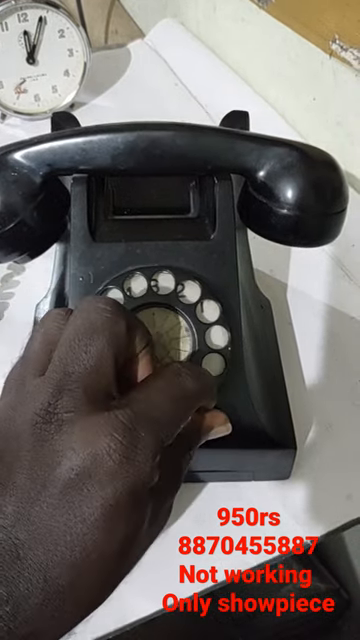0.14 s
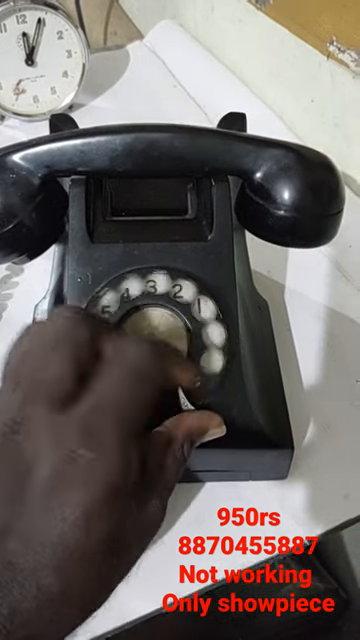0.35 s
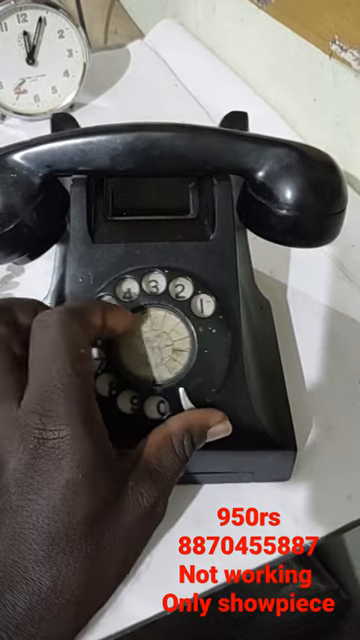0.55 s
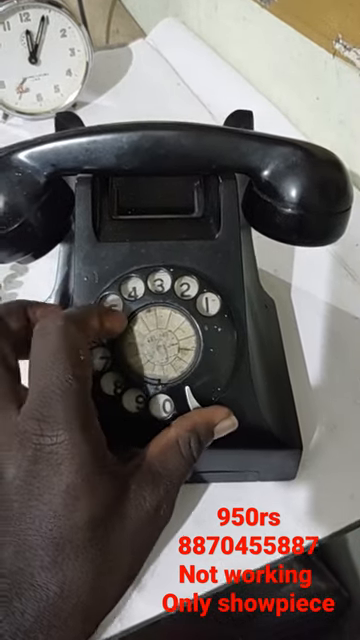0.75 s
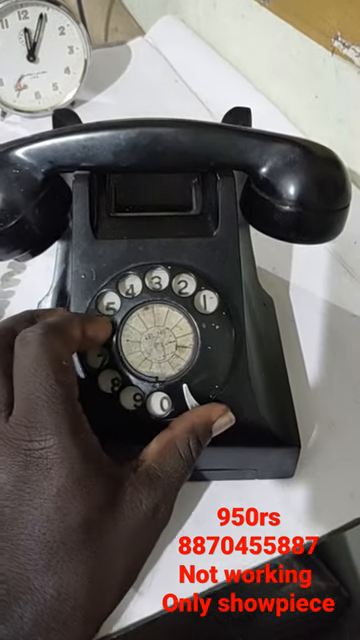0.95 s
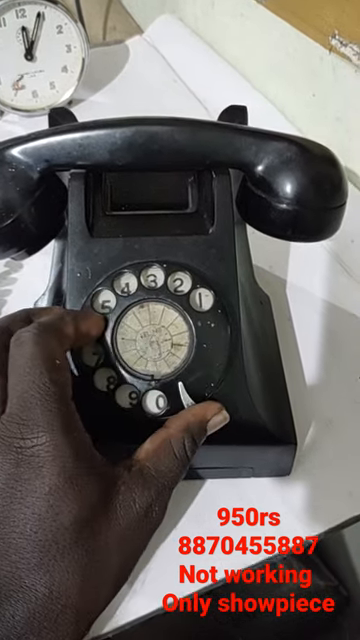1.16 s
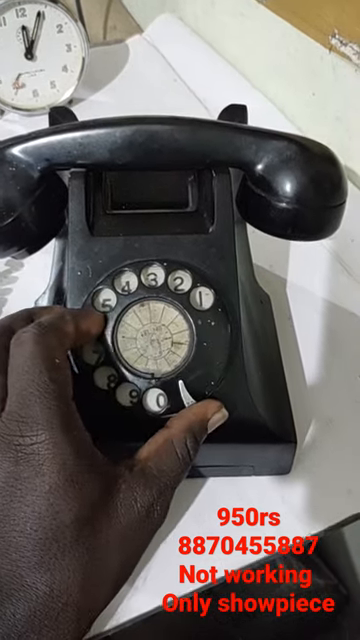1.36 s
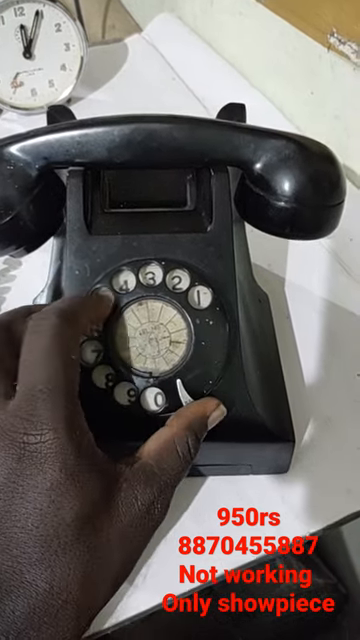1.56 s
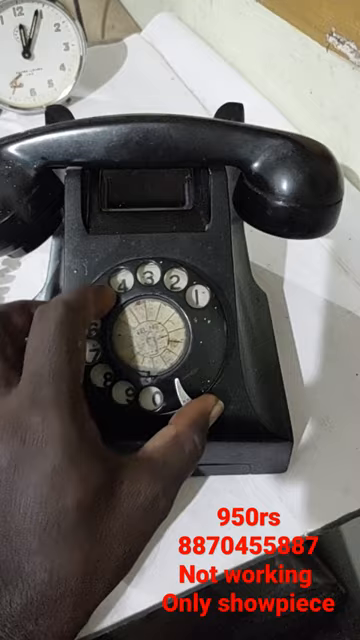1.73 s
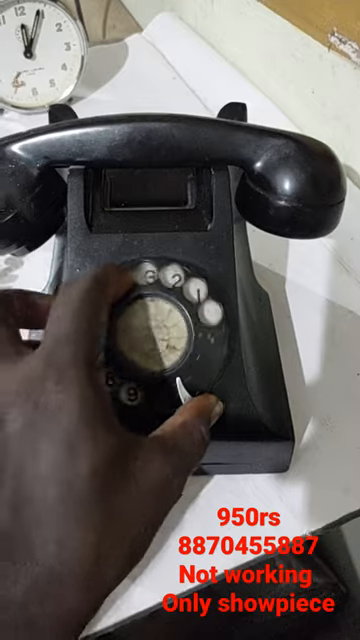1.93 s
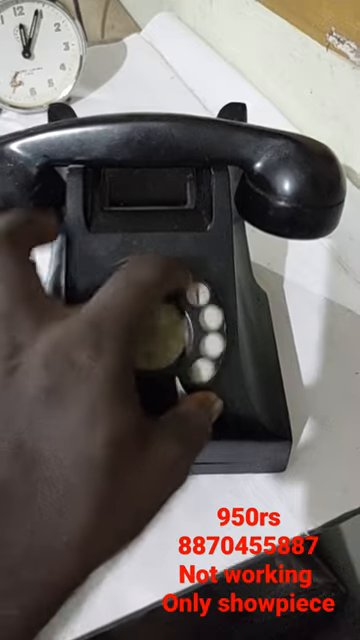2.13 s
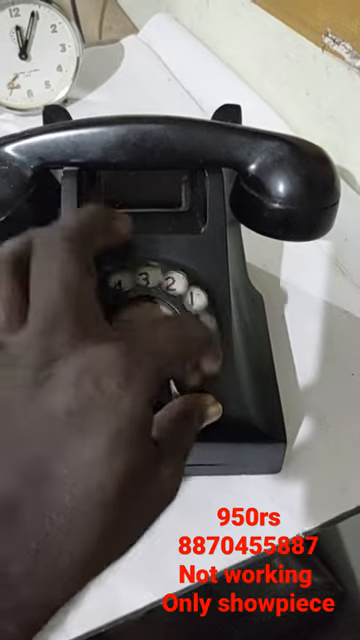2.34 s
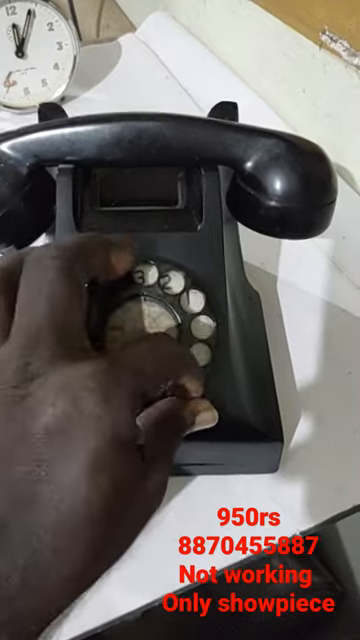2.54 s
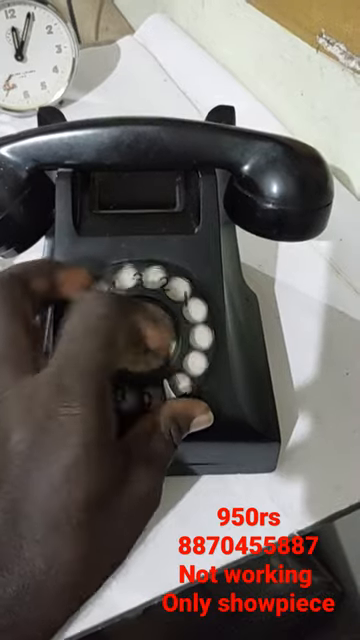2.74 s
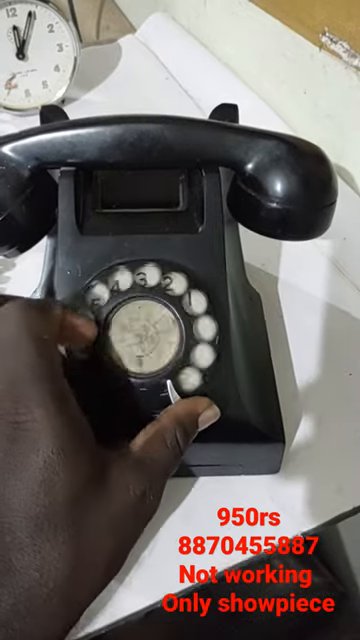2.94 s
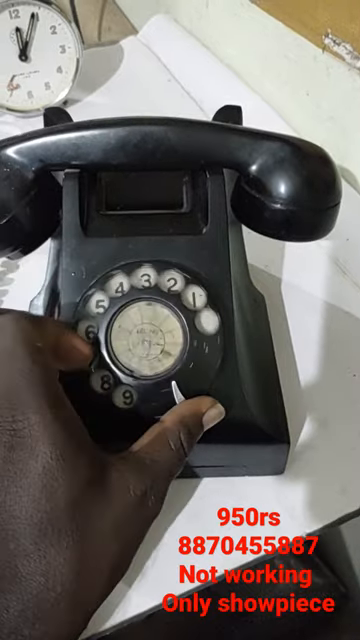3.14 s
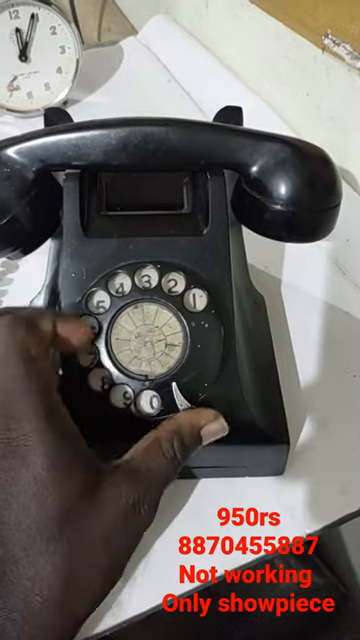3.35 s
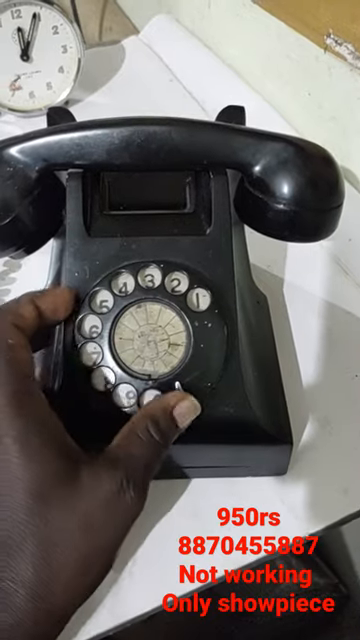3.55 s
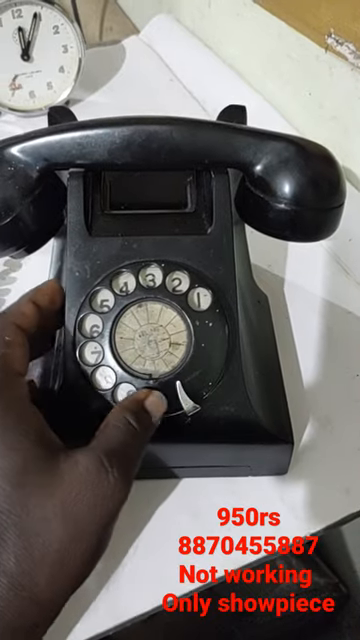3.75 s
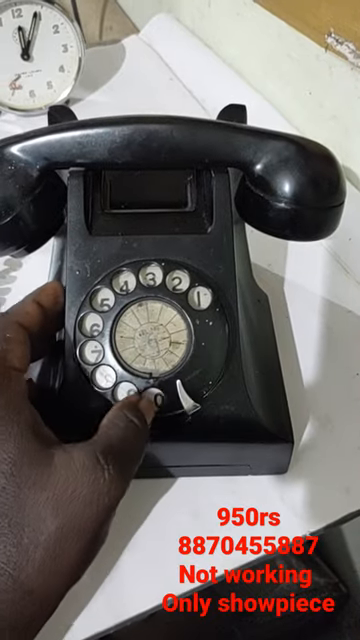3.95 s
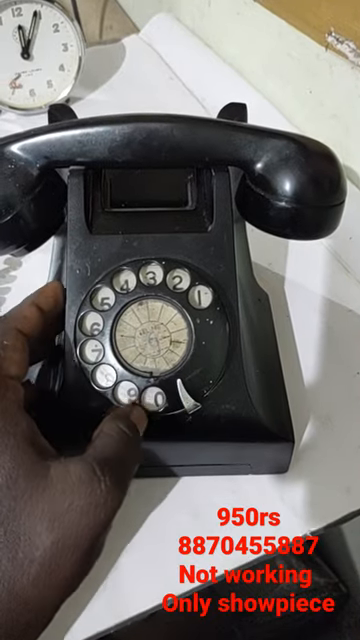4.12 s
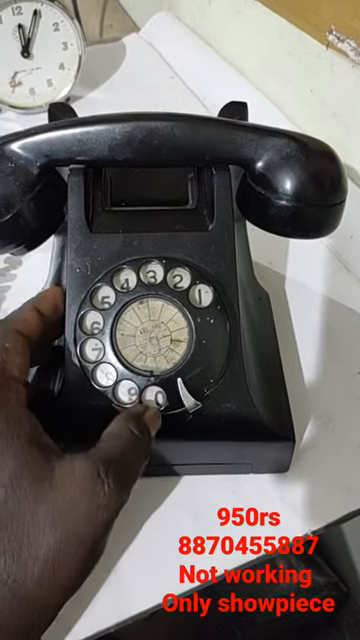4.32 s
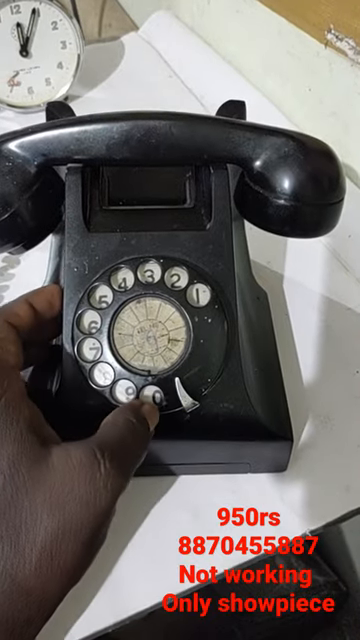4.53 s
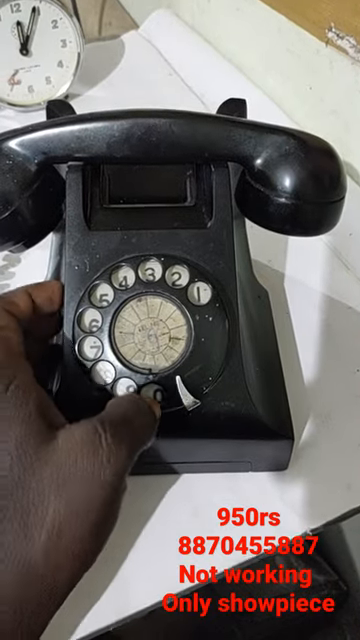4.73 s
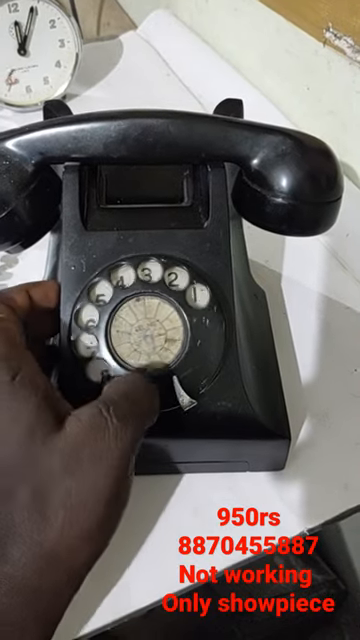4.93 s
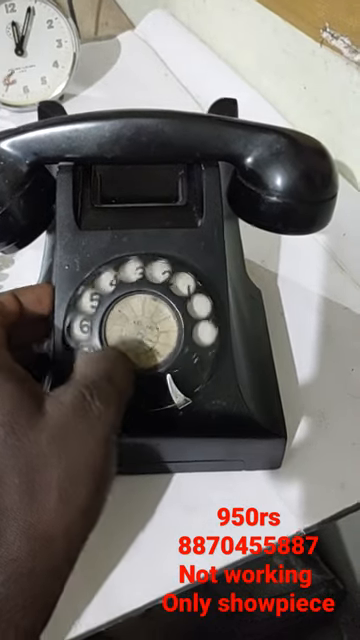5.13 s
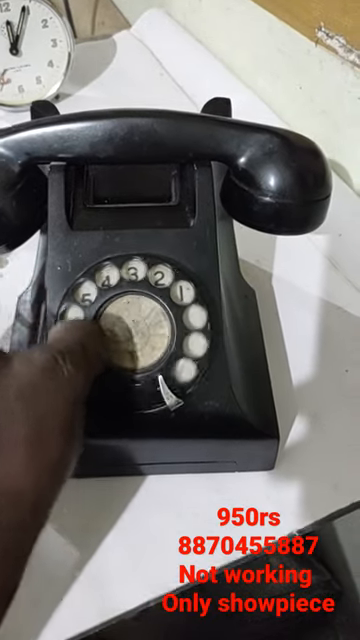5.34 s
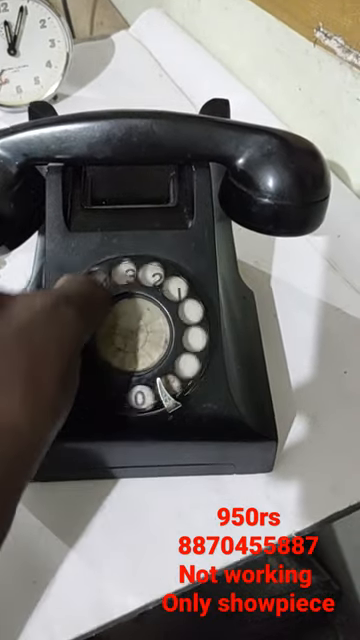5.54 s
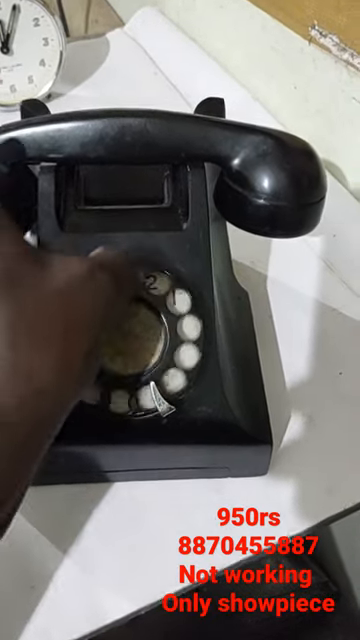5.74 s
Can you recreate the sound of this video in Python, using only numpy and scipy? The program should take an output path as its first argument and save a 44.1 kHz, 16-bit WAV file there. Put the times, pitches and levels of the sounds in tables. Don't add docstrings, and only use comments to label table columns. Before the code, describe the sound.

A hand works an old rotary desk phone in a quiet room. Two clicks, then a sharp knock and a short, braked whir. After a pause, quicker clicks wind the wheel; it whirs back louder and ends in a firm clack. Slower clicks follow at the end. Close stereo microphones, phone slightly left, with faint hum and fan noise behind.

```python
import sys
import numpy as np
from scipy import signal
from scipy.fft import rfft, irfft
from scipy.io import wavfile

SR = 44100
rng = np.random.default_rng(int(sys.argv[2]) if len(sys.argv) > 2 else 0)


def ratio(d):
    e = np.asarray(d, float) / 20
    return 10 ** e


def waveform_to_disk(signal):
    frames = np.transpose(np.atleast_2d(signal))
    scaled = np.clip(frames, -1, 1) * 32767
    samples = np.round(scaled).astype(np.int16)
    wavfile.write(sys.argv[1], SR, samples)


N = 259308

# (f/Hz, width/Hz, then level/dB for pawl, knock, tap, gears, stop)
CASE_MODES = [(466, 48, -40, -8.5, -54, -5.5, -8.5), (820, 69, -45, -10, -43, -10.5, -9),
              (990, 260, -15.5, -7, -11, -18, -9), (1738, 64, -4.5, 8.5, -14, 0.5, 6.5),
              (2071, 67, -1.5, 7, -25, 0.5, -16), (2268, 200, -23, -31, 8, -7.5, -1),
              (2620, 182, 5, -2.5, 19.5, -0.5, 1.5), (2716, 640, -52, -14, -7, -9.5, -19)]
# (f/Hz, width/Hz, then level/dB for pawl, knock, tap, gears, stop)
PLATE_MODES = [(3823, 220, 2.5, -18.5, -17, -21, -9.5), (4140, 301, -16.5, -20, -33, -18.5, -15),
               (5445, 420, -4, -9.5, -46, -24, -36), (6040, 158, -7.5, -10.5, -42, -20, -19),
               (6240, 335, -20, -13, -41, -25.5, -6.5), (8100, 640, -18, -31.5, -44, -32.5, -24),
               (9340, 750, -19, -31, -46, -33, -27), (10120, 510, -49, -45, -46, -35.5, -22),
               (10720, 1800, -15, -28, -54, -39.5, -24), (13470, 2500, -14.5, -23.5, -42, -54, -31),
               (14800, 930, -14.5, -40, -51, -43, -36), (9050, 3700, -38, -28, -55, -43, -53)]


def rms_one(x):
    return x / np.sqrt(np.mean(x ** 2) + 1e-20)


def at_hz(points, hz):
    table_hz, values = np.transpose(points)
    return np.interp(np.log(hz), np.log(table_hz), values)


def drift(rate_hz):
    r = np.exp(-2 * np.pi * rate_hz * 40 / SR)
    noise = rng.standard_normal(N // 40 + 2002)
    slow = signal.lfilter([1], [1, -2 * r, r * r], noise)[2000:]
    return np.interp(np.arange(N) / 40, np.arange(len(slow)), rms_one(slow))


def resonate(x, hz, width):
    r = np.exp(-np.pi * width / SR)
    poles = [1, -2 * r * np.cos(2 * np.pi * hz / SR), r * r]
    return signal.lfilter(np.array([1, 0, -1]) * (1 - r * r) / 2, poles, x)


def widen(mid, side, alike):
    return np.sqrt(1 + alike) * mid + np.sqrt(1 - alike) * side * [[1], [-1]]


def pan(db):
    return ratio(np.array([[0.5], [-0.5]]) * db)


def blows(events, column, contact_s, alike, gain_db, pan_db, plate, bright):
    out, size = np.zeros((2, N)), 2500
    t = np.arange(size) / SR
    contact = t / contact_s * np.exp(-t / contact_s) + 1e-12
    shiver_shape = np.exp(-t / 0.016) * (1 - np.exp(-t / 0.0015))
    for s, peak_db, snap_db, hollow_db in events:
        shared, own = rng.standard_normal((2, size))
        pair = contact * widen(shared, own, alike)
        ring = 0
        for mode in CASE_MODES + PLATE_MODES:
            hz, width = mode[:2]
            if hz < 2400:
                part_db = hollow_db
            elif hz < 3300:
                part_db = 0
            else:
                part_db = snap_db * (plate if hz < 4800 else bright)
            swing = resonate(resonate(pair, hz, 1.3 * width), hz, 2.97 * width)
            swing /= np.sqrt(np.sum(swing ** 2, axis=1, keepdims=True) / width)
            sides = pan(pan_db * np.clip(1.6 - hz / 9000, 0, 1))
            ring = ring + sides * ratio(mode[column] + part_db + rng.standard_normal()) * swing
        ring *= ratio(peak_db + gain_db) / np.abs(ring.mean(axis=0)).max()
        shiver = resonate(rng.standard_normal((2, size)), 3000, 3500) * shiver_shape
        ring += ratio(peak_db - 19.5) * pan(0.6 * pan_db) * shiver
        at = round(s * SR)
        out[:, at:at + size] += ring[:, :N - at]
    return out


def pawl():
    # (t/s, peak level/dB, snap/dB, hollowness/dB)
    clicks = [(0.0391, -31, -5.5, -0.5), (0.1292, -29.5, -4.5, -2), (2.0537, -31, -5, 3.5),
              (2.1543, -29.5, -3, 4), (2.2354, -30, -4.5, 1), (2.3129, -31, -1.5, 2),
              (2.3767, -30.5, 1.5, -1), (2.4267, -32, -0.5, 1), (2.5062, -32.5, -1.5, 1.5),
              (5.1277, -31.5, -4, 1.5), (5.2813, -32, -0.5, -3), (5.433, -31.5, 4, 0), (5.547, -29, 3, 0),
              (5.6975, -29.5, 7, 3), (5.8214, -32.5, 5, 1)]
    return blows(clicks, column=2, contact_s=0.00059, alike=0.54, gain_db=1.3, pan_db=9.0, plate=1.02, bright=0.8)


def gears(jitter, grit, alike, throb_db):
    # (t/s, drive level/dB on the gear train)
    runs = [
        [(0.38, -50.5), (0.402, -51.5), (0.44, -48), (0.535, -46), (0.556, -47.5), (0.644, -47.5), (0.665, -78)],
        [(2.72, -67), (2.75, -55.5), (2.8, -52.5), (2.952, -44.5), (3.06, -43.5), (3.2, -42.5), (3.236, -44),
         (3.254, -40.5), (3.318, -46.5)],
    ]
    tooth_levels = [0, -6, -5]
    t, out = np.arange(N) / SR, np.zeros((2, N))
    teeth_per_s, mesh_hz, mean_drive_db = 310, 367.6, -47
    turn = np.cumsum(teeth_per_s * (1 + jitter * drift(25)) / SR)
    tooth = turn.astype(int)
    uneven_db = 1.5 * rng.standard_normal(N)[tooth]
    strength = ratio(np.array(tooth_levels)[tooth % 3] + uneven_db + throb_db * drift(38))
    force = strength * np.exp(-(turn - tooth) * 2.6) + grit
    shared, own = rng.standard_normal((2, N))
    pair = force * widen(shared, own, alike)
    rings = []
    for k, mode in enumerate(CASE_MODES + PLATE_MODES):
        hz, width = mode[:2]
        rings.append((-1) ** k * ratio(mode[5]) * resonate(pair, hz, width))
    rumble = rms_one(sum(rings[:3]) + ratio(-6.5) * resonate(force * shared, 281, 82))
    body = rms_one(resonate(sum(rings[3:6]), 2020, 1600))
    whine = rms_one(resonate(sum(rings[6:8]), 2730, 740))
    rattle = rms_one(sum(rings[8:]))
    mesh = rms_one(resonate(resonate(shared, mesh_hz, 28), mesh_hz, 77))
    for run, brake_db in zip(runs, (-3, 0)):
        s, drive_db = np.transpose(run)
        swing_db = np.interp(t, s, drive_db) - mean_drive_db
        gate = np.clip((t - s[0]) / 0.069 + 1, 0, 1) * np.clip((s[-1] - t) / 0.032 + 1, 0, 1)

        def layer(db, share):
            return gate * ratio(db + share * swing_db)

        upper = layer(-48, 0.83) * body + layer(-60.5, 0.3) * rattle
        upper += layer(-52.5, 1.3) * whine
        lower = layer(-55.5, 1.2) * ratio(brake_db) * mesh + layer(-54, 0.6) * rumble
        out += upper * ratio([[4.5], [-0.6]]) + lower * pan(2.4)
    return out


def stops():
    # (t/s, peak level/dB, snap/dB, hollowness/dB)
    hits = [(0.571, -40.5, -4, 2), (0.6397, -42.5, -6, -5), (3.1775, -32, -5, 3), (3.2453, -35, -5, 7),
            (3.255, -36, -6, 2), (3.2627, -42, -13, 3), (3.274, -42, -12, 5), (3.303, -38, -10, -3),
            (3.3333, -23.5, 0.5, 1), (3.345, -36, 0, 3), (3.357, -37.5, -3, 3)]
    return blows(hits, column=6, contact_s=0.00062, alike=0.57, gain_db=1.5, pan_db=5.5, plate=0.78, bright=1.4)


def knocks():
    # (t/s, peak level/dB, snap/dB, hollowness/dB)
    hits = [
        (0.3514, -17.5, 5.5, -2.5),
        (2.6859, -34.5, 1, 1),
    ]
    return blows(hits, column=3, contact_s=0.00066, alike=0.87, gain_db=0.5, pan_db=8.0, plate=1.4, bright=0.66)


def taps():
    # (t/s, peak level/dB, snap/dB, hollowness/dB)
    nails = [
        (0.3437, -29, 12, 14),
        (0.619, -33.5, -1, -1),
        (2.6774, -45, 20, 10),
        (5.529, -31, -1, -2),
        (1.3, -46.5, -1, 21),
    ]
    return blows(nails, column=4, contact_s=0.000305, alike=0.59, gain_db=-1.5, pan_db=5.5, plate=1.1, bright=0.4)


def narrow_dip(x):
    return x - 1.3 * resonate(x, 3310, 340)


def thumps():
    # (t/s, peak level/dB, f/Hz, t60/s)
    jolts = [
        (0.351, -51.5, 125, 0.37),
        (2.084, -51, 145, 0.31),
        (4.88, -59, 170, 1),
    ]
    out, t = np.zeros(N), np.arange(N) / SR
    shudder_s, rise_s = 0.033, 0.0014
    for s, peak_db, hz, t60 in jolts:
        boom = rms_one(resonate(resonate(rng.standard_normal(N), hz, 94), hz, 144))
        since = np.clip(t - s, 0, None)
        fall_db = -60 * np.clip(since - shudder_s, 0, None) / t60
        out += ratio(peak_db - 5 + fall_db) * np.clip(since / rise_s, 0, 1) * boom
    return out


def room(x):
    early_t60_s, early_db = 0.094, -9
    late_t60_s, late_db, wall_cut_hz = 0.38, -14, 9000
    t = np.arange(SR) / SR
    early, late = rng.standard_normal((2, 2, SR))
    early = early * ratio(-60 * t / early_t60_s) * np.clip(t / 0.002, 0, 1) ** 2
    late = late * ratio(-60 * t / late_t60_s) * np.clip(t / 0.014, 0, 1)
    late = signal.sosfilt(signal.butter(1, wall_cut_hz, fs=SR, output="sos"), late)
    tail = (ratio(early_db) * rms_one(early) + ratio(late_db) * rms_one(late)) / np.sqrt(SR)
    return signal.fftconvolve(x[None], tail)[:, :N]


def busy_lift_db():
    # (from t/s, to t/s)
    busy = [
        (0, 0.91),
        (2.2, 4.06),
        (5.2, 5.88),
    ]
    t = np.arange(N) / SR
    rise_s, fall_s = 0.12, 0.17
    stirs = []
    for start, end in busy:
        away = np.clip(start - t, 0, None) / rise_s + np.clip(t - end, 0, None) / fall_s
        stirs.append(np.exp(-away))
    return -0.5 + 4 * np.max(stirs, axis=0)


def room_noise(patchy_db):
    # (f/Hz, level/dB per Hz)
    air = [(18, -52), (30, 15.5), (70, -21), (91, -5.5), (125, -15.5), (163, -4), (255, -6.5), (432, -8),
           (480, -4), (858, -16), (1120, -11.5), (2470, -19), (5030, -34.5), (13700, -47), (16500, -17)]
    # (f/Hz, width/Hz, level/dB)
    fan_peaks = [(260.3, 24, -1), (489, 48, 2), (2280, 187, -11.5), (3530, 83, -12)]
    # (f/Hz, rms level/dB)
    mains = [(100, -72.5)]
    # (f/Hz, correlation)
    likeness = [(60, 0.62), (180, 1), (550, 0.64), (1650, -0.25), (4970, -0.81), (15000, 0.058)]
    # (f/Hz, level/dB left over right)
    balance = [(60, -5.5), (240, 0.5), (950, 1), (3770, 15), (15000, -3)]
    out, edges = 0, 28 * 2 ** np.arange(0, 9.4, 0.4)
    white = rng.standard_normal((2, 2, N))
    t = np.arange(N) / SR
    hiss_db = busy_lift_db()
    for k, (low, high) in enumerate(zip(edges, edges[1:])):
        band = signal.butter(2, [low, high], "band", fs=SR, output="sos")
        mid, side = signal.sosfilt(band, white[k % 2])
        hz = np.sqrt(low * high)
        alike = np.clip(at_hz(likeness, hz), -1, 1)
        level_db = at_hz(air, hz) + patchy_db * drift(9.6) + hiss_db * (hz > 1400)
        out = out + ratio(level_db) * pan(at_hz(balance, hz)) * widen(mid, side, alike)
    mid, side = rng.standard_normal((2, N))
    fan = (mid + 0.29 * side * [[1], [-1]]) * pan(3)
    for hz, width, db in fan_peaks:
        out = out + ratio(db) * resonate(fan, hz, width)
    out = signal.sosfilt(signal.butter(4, 60, "high", fs=SR, output="sos"), out)
    hum = 0
    for hz, db in mains:
        hum = hum + ratio(db + 3.5 + 2 * drift(1.5)) * np.sin(2 * np.pi * hz * t + 0.31 * drift(9))
    return ratio(-58) * rms_one(out) + hum


def scene():
    phone = pawl() + gears(jitter=0.02, grit=0.14, alike=0.46, throb_db=1.4) + stops() + knocks() + taps()
    phone = narrow_dip(phone)
    return phone + room(phone.mean(axis=0)) + thumps() + room_noise(patchy_db=1.0)


def low_pass(x):
    return signal.sosfilt(signal.butter(12, 16940, fs=SR, output="sos"), x)


def record(dry):
    left_lag_s, spread_s, cutoff_hz = 0.0001, 0.0013, 15850
    hz = np.arange(N // 2 + 1) * SR / N
    lag = spread_s * (2500 - hz / 2) / 12000 + left_lag_s * np.array([[1], [0]])
    ends_db = -30 * np.clip(1 - hz / 70, 0, 1) - 22 * np.clip((hz - cutoff_hz) / 120, 0, 1)
    mix = irfft(rfft(dry) * ratio(ends_db) * np.exp(-2j * np.pi * hz * lag), N)
    return low_pass(mix)


dry = scene()
out = record(dry)
waveform_to_disk(out)
```